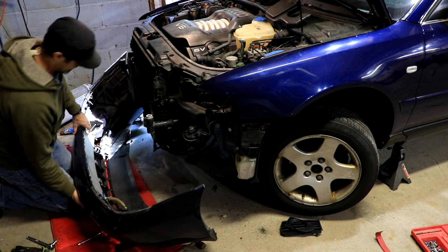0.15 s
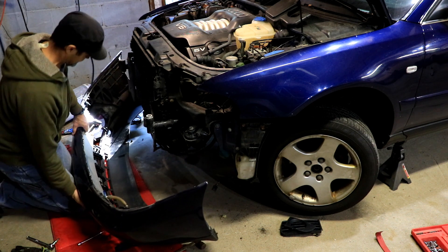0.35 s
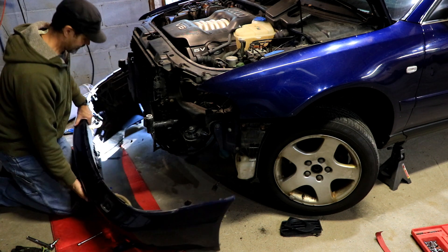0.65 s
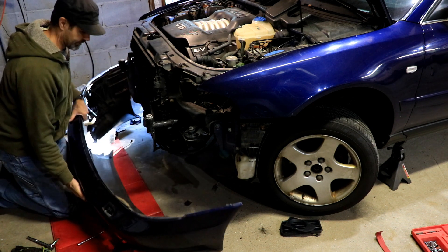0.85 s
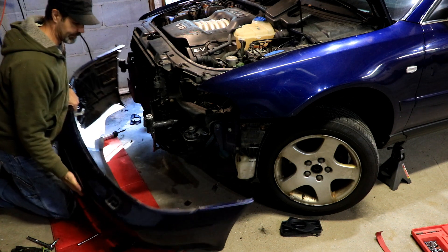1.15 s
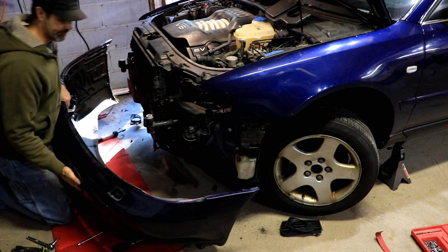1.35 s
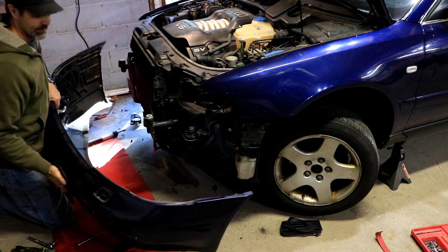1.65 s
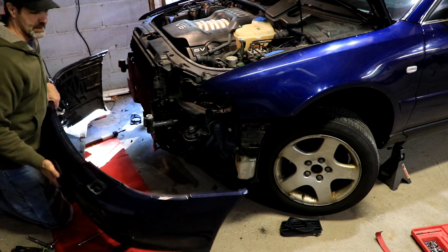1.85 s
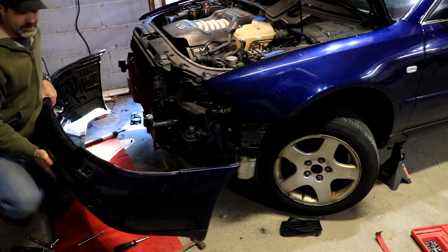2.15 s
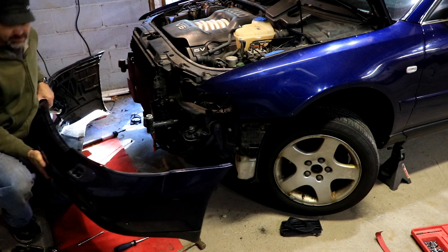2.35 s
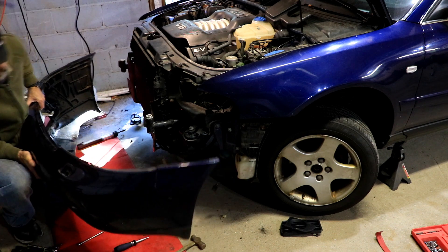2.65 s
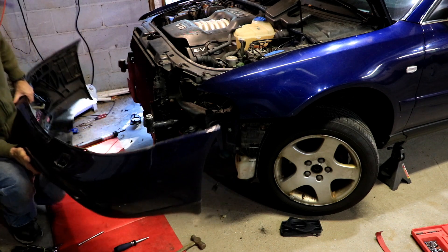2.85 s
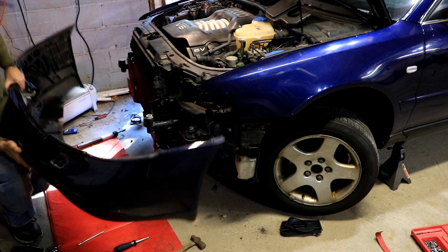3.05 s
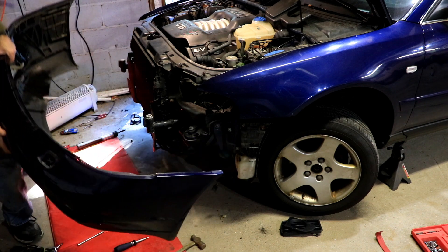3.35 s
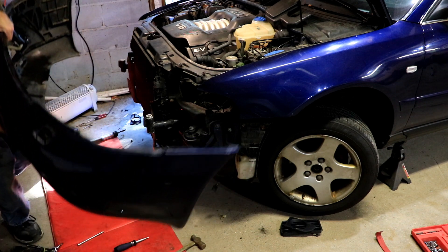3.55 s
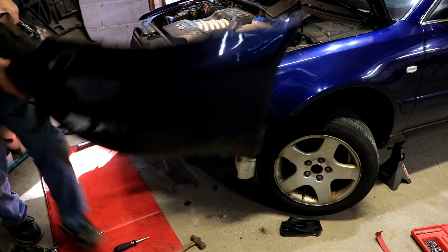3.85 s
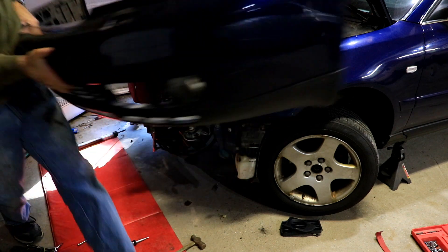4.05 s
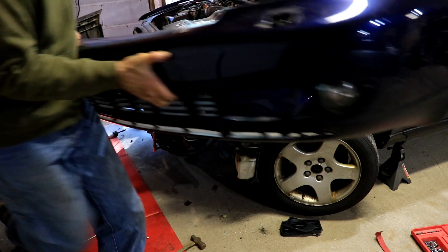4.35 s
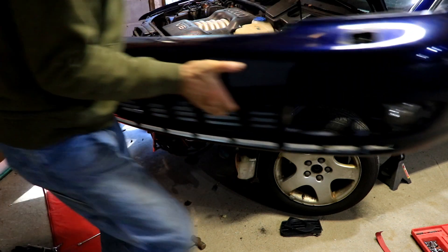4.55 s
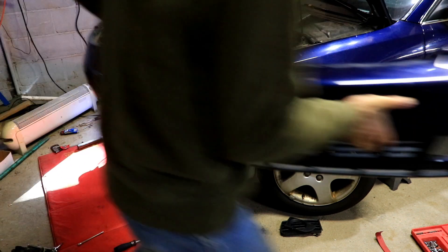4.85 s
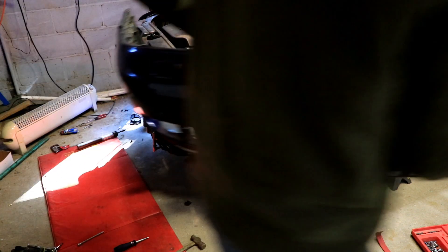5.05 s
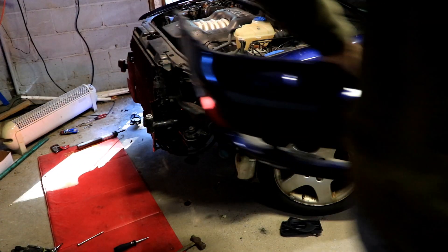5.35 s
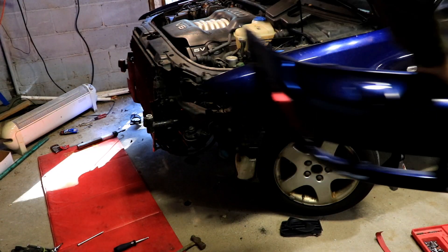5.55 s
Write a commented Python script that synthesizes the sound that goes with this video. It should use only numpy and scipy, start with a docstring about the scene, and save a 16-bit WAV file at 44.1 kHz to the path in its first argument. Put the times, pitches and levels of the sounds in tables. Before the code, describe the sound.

A quiet garage with a low room tone, faint hiss and short hard-walled reverberation; practically centred sound. From 0 s a plastic bumper cover slides with soft hisses. At 0.55-0.76 s hollow knocks land, with a very sharp snap at 0.7, then a thin, faint plastic squeal. Cloth rustles and light knocks follow at 1.0-1.4, a smooth slide at 1.7. At 2.0-2.2 knocks lead into a coarse, gritty scrape with a brief screech around 2.25-2.35, while a steel rod bounces with bright clinks until 2.5. A short rubbery judder comes at 2.77. At 3.2-3.5 a steel tool is shoved ringing across concrete, fading into dull dragging. From 4.2 cloth swishes, tiny very high jingles and plastic knocks come close, with dry creaking snaps crowding 4.36-5.03. A soft low flutter of air passes at 5.0; a last soft slide and small knock at 5.55-5.65.

```python
"""Plastic shell dragged through a garage

A man drags a plastic bumper cover off a car, lifts it and carries it past the microphone. Modal blows and
stick-slip friction make the shell knock, slide and judder on the floor and shove steel tools about.
Sharp cracks, decaying pressure swings, edge some knocks and become creaking dry snaps close by, while a small
metal piece rings in its modes.
Block walls answer as decaying noise; the sound is the same left and right, except for a faint hiss."""
import sys
import numpy as np
from scipy import signal
from scipy.fft import rfft, irfft
from scipy.io import wavfile

SR = 44100
rng = np.random.default_rng(int(sys.argv[2]) if len(sys.argv) > 2 else 0)


def dump_mix(stems):
    """Bounce the given channels to the path in sys.argv[1] as a 16-bit WAV at rate SR."""
    frames = np.atleast_2d(stems).T  # one column per channel
    limited = np.clip(frames, -1, 1)  # hard clip at full scale
    pcm = np.round(limited * 32767).astype(np.int16)
    wavfile.write(sys.argv[1], SR, pcm)


N = 251359
T = np.arange(N) / SR
RING = T[:SR // 2]  # time axis of one ringing sound, in seconds


def undb(db):
    """Logarithmic level: decibels to amplitude gain."""
    return 10 ** (np.asarray(db) / 20)


def unit(x):
    """Power normalization: scale to rms 1."""
    return x / np.sqrt(np.mean(x ** 2))


def unit_attack(x):
    """Onset normalization: scale a blow to rms 1 over its first 20 ms."""
    return x / np.sqrt(np.mean(x[:SR // 50] ** 2))


def add(track, s, sound):
    """Superposition: mix a sound in at time s."""
    i = max(int(s * SR), 0)
    track[i:i + len(sound)] += sound[:N - i]


def cut(x, hz, kind="low", order=2):
    """Band limiting by a Butterworth low- or high-pass."""
    return signal.sosfilt(signal.butter(order, min(hz, SR / 2 - 1), kind, fs=SR, output="sos"), x)


def colour(x, points):
    """Spectral shaping: weight a signal by a (Hz, dB) curve, then scale to rms 1."""
    hz, db = np.transpose(points)
    size = 2 ** 18
    f = np.fft.rfftfreq(size, 1 / SR) + 1  # the 1 Hz offset keeps the logarithm finite
    gain = undb(np.interp(np.log(f), np.log(hz), db))
    return unit(irfft(rfft(x, size) * gain)[:N])


def fade(t60):
    """Exponential damping: 60 dB lost in t60 seconds."""
    return np.exp(-np.log(1000) * RING / t60)


def ring(modes, scatter_db, detune=0):
    """Modal superposition: each blow weights the modes anew, and the changing support detunes them."""
    share, shift = rng.standard_normal((len(modes), 2)).T
    out = 0
    for k, (hz, db, t60) in enumerate(modes):
        swing = np.sin(2 * np.pi * hz * (1 + detune * shift[k]) * RING)
        out = out + (-1) ** k * undb(db + scatter_db * share[k]) * swing * fade(t60)
    return out


def resonate(x, modes, damping=1):
    """Forced resonance: drive (Hz, width Hz, dB) modes through a unit-energy impulse response."""
    response = 0
    for k, (hz, width, db) in enumerate(modes):
        decay = np.exp(-np.pi * damping * width * RING)
        response = response + (-1) ** k * undb(db) * width * np.sin(2 * np.pi * hz * RING) * decay
    return signal.fftconvolve(x, response / np.sqrt(np.sum(response ** 2)))[:N]


def walk(rate):
    """Slow random fluctuation: interpolated chance, rate values a second, with a spread near 1."""
    return 1.2 * np.interp(T * rate, np.arange(4000), rng.standard_normal(4000))


def waver(x, depth, rate):
    """Frequency modulation: a drifting clock makes all pitches wander together by a small share."""
    clock = np.arange(N)
    drift = signal.lfilter([depth], [1, -1 + 10 / SR], walk(rate))
    finer = signal.resample_poly(x, 4, 1)
    return np.interp(clock + drift, np.arange(4 * N) / 4, finer)


def friction(rate, spread_db, uneven_db):
    """Stick-slip friction: tiny slips of unequal size, rate a second, scaled by uneven pressure."""
    slips = (rng.random(N) < rate / SR) * rng.choice([-1, 1], N)
    sizes = undb(spread_db * np.minimum(rng.exponential(size=N), 5))
    return unit(slips * sizes * undb(uneven_db * walk(90)))


def stroke(start, db, attack, hold, release, power=1):
    """Energy envelope of a rub: at power 1, energy grows evenly, holds, then falls 20 dB per release time."""
    rise = np.sqrt(np.clip((T - start) / attack, 0, 1))
    fall = undb(-20 * np.maximum(T - start - attack - hold, 0) / release)
    return undb(db) * (rise * fall) ** power


def strokes(rows, power=1):
    """Incoherent addition: where strokes overlap their energies add."""
    return np.sqrt(sum(stroke(*row, power=power) ** 2 for row in rows))


def raised(rows, axis):
    """Level offset: the same strokes with one of their dB columns added to the level."""
    return [(row[0], row[1] + row[axis], *row[2:5]) for row in rows]


TREBLE_POWER = 1.66  # the treble's rise and fall follow the stroke's rise and fall to this power


def rubbed(x, rows, split_hz):
    """Speed-dependent friction: treble has its own level and fades faster as the motion slows."""
    body = cut(x, split_hz) * strokes(row[:5] for row in rows)
    treble = cut(x, split_hz, "high") * strokes(raised(rows, axis=5), TREBLE_POWER)
    return body - treble


def room(x, t60_low=0.55, t60_high=0.37, air_hz=9000, delay=0.001):
    """Diffuse reverberation of the garage: decaying noise whose treble dies first."""
    noise = rng.standard_normal(len(RING))
    low = cut(noise, 1230) * fade(t60_low)
    high = cut(cut(noise, 2090, "high"), air_hz, order=1) * fade(t60_high)
    tail = (low - high) * np.clip(RING / delay - 1, 0, 1)  # silent for one delay, then rising over another
    return signal.fftconvolve(x, tail / np.sqrt(np.sum((noise * fade(t60_low)) ** 2)))[:N]


# Spectrum of the quiet garage. Each row: frequency in Hz, relative level in dB.
GARAGE_COLOUR = [(12, -39), (20, -11), (86, 2), (198, -3.5), (328, 1), (527, -11.5), (660, -2), (802, -9),
                 (1190, -7), (1440, -9), (1910, -11), (6720, -20.5), (8410, -19), (14700, -25.5),
                 (16000, -26)]


def garage_noise(level_db=-50, sway_db=0.8):
    """Background noise: coloured noise of the garage whose level sways slowly."""
    return undb(level_db + sway_db * walk(4)) * colour(rng.standard_normal(N), GARAGE_COLOUR)


# Air stirred by the passing body, and its wake. Each row: start in seconds, relative level in dB,
# attack, hold and release in seconds.
DRAUGHTS = [(4.985, -43.5, 0.035, 0.032, 0.62), (5.35, -51, .05, .05, .1)]


def draught(level_db=-1):
    """Turbulence: low-frequency noise flutters as the man walks by."""
    flutter = colour(rng.standard_normal(N), [(15, -33), (25, -25), (33, 2.0), (50, 0), (75, -20.0),
                                              (130, -8.5), (500, -85)])
    return undb(level_db) * flutter * strokes(DRAUGHTS)


# Clothes and hands on the shell, one swish a move. Each row: start in seconds, relative level in dB,
# length before the release in seconds.
RUSTLES = [(0.865, -53, 0.23), (1.136, -42.5, 0.27), (2.766, -47.5, 0.12), (3.107, -50.5, 0.064),
           (4.028, -50.5, 0.23), (4.212, -39.5, .17), (4.487, -47, .2), (4.76, -41, 0.28)]
# Spectrum of the rustle. Each row: frequency in Hz, relative level in dB.
RUSTLE_COLOUR = [(59, -44), (100, -6), (204, -1), (521, 4), (665, -9), (999, -4), (2210, -6.5),
                 (2880, -7.5), (5090, -10.5), (7060, -17), (8310, -10), (10600, -30), (13000, -20)]


def rustling(level_db=-2, attack_share=0.27, release_s=0.18):
    """Fibre friction: many uneven slips of cloth and hands blend into swishes."""
    moves = [(s, db, attack_share * length, (1 - attack_share) * length, release_s)
             for s, db, length in RUSTLES]
    return undb(level_db) * colour(friction(9000, 2.2, 1.2), RUSTLE_COLOUR) * strokes(moves)


# Dull dragging as the shell is lifted. Each row: start in seconds, relative level in dB,
# attack, hold and release in seconds.
DRAGS = [(3.42, -37.5, 0.065, 0.22, 0.53), (3.78, -44.5, 0.03, 0.064, 0.19)]
# Spectrum of the dragging. Each row: frequency in Hz, relative level in dB.
DRAG_COLOUR = [(59, -47), (100, -12), (391, -3.5), (452, -7), (502, -1.5), (885, -6), (983, -8),
               (1210, -4.5), (1460, -20), (1590, -0.5), (1840, -12.5), (2270, -8), (2920, -15.5),
               (8340, -26), (15000, -52)]
# Resonances that drone under it. Each row: frequency in Hz, width in Hz, relative level in dB.
DRAG_MODES = [(517, 20, -4), (878, 12, 4), (1220, 70, -1), (1574, 40, 1), (1585, 38, -1.5), (2270, 21, -6)]


def dragging(scrape_db=-3, drone_db=-7):
    """Friction-driven resonance: slips scrape dully and make the shell drone."""
    drone = undb(drone_db) * unit(resonate(friction(4800, 1.0, 0.61), DRAG_MODES))
    scrape = undb(scrape_db) * colour(friction(5000, 0.8, 0.39), DRAG_COLOUR)
    return (scrape + drone) * strokes(DRAGS)


# Short rubbery judders. Each row: start in seconds, level in dB, attack, hold and release in seconds.
JUDDERS = [(2.757, -38, .008, .004, .02), (2.766, -28.5, 0.013, 0.023, 0.011)]
# Spectrum of the judder. Each row: frequency in Hz, relative level in dB.
JUDDER_COLOUR = [(59, -69), (100, -41), (179, -0.5), (275, -17), (387, -5.5), (681, -3.5), (768, -6),
                 (1000, -5), (1410, -18.5), (1870, -22), (3500, -57), (4550, -74), (7700, -120)]


def juddering(judder_hz=92):
    """Periodic stick-slip: the edge sticks and lets go in quick succession, each time a decaying burst."""
    stick_slip = rng.standard_normal(N) * np.exp(-2 * (T * judder_hz % 1))
    return colour(stick_slip, JUDDER_COLOUR) * strokes(JUDDERS)


# Thin squeals of rubbed plastic. Each row: start in seconds, relative level in dB,
# attack, hold and release in seconds.
SQUEALS = [(.81, -39.5, 0.048, .015, 0.36), (.97, -45.5, .04, 0.049, 0.25)]
# Resonances of the squeal. Each row: frequency in Hz, width in Hz, relative level in dB.
SQUEAL_MODES = [(2180, 170, -5), (2384, 41, 3.5), (2550, 310, -9)]


def squealing(level_db=-2):
    """Friction-driven resonance: rough slips feed a few close modes of the plastic."""
    return undb(level_db) * unit(resonate(friction(3000, 0.98, 1), SQUEAL_MODES)) * strokes(SQUEALS)


def handling(room_db=-7):
    """Superposition: dragging, rustling, judder and squeal share one reverberation."""
    out = dragging() + rustling() + juddering() + squealing()
    return out + undb(room_db) * room(out)


# Light slides over mat and floor, grouped by the part of the shell that touches. Each row: start in seconds,
# relative level in dB, attack, hold and release in seconds, treble offset in dB.
SLIDES = [
    [(.008, -37.5, 0.025, 0.058, .1, 0.5), (.075, -34, 0.035, 0.037, 0.32, -3),
     (.385, -48, 0.013, .02, 0.47, -7)],
    [(.56, -40, .11, 0.014, 0.4, 2), (1.615, -45, 0.018, 0.095, .1, -4),
     (1.697, -34.5, 0.035, 0.064, 0.14, -7), (2.01, -47.5, 0.058, 0.16, .15, -3.5),
     (2.8, -55.5, 0.077, .03, 0.28, -3)],
    [(5.534, -41.5, 0.0091, 0.14, 0.17, -12)],
]
# One spectrum for each group of slides. Each row: frequency in Hz, relative level in dB.
SLIDE_COLOURS = [
    [(59, -46), (100, -9), (197, -1), (302, 4), (442, -5), (621, 1.5), (676, -5.5), (950, -2), (1170, -5.5),
     (2000, -3.5), (4380, -8.5), (5190, -7), (8830, -14), (14400, -31.5), (16000, -28)],
    [(59, -43), (100, -3.5), (224, 4), (406, -4.5), (442, -3), (524, 1.5), (872, -11), (970, -5),
     (1680, -5.5), (2580, -1.5), (3780, -6.5), (4770, -4.5), (8640, -3.5), (13200, -14.5), (16000, -14)],
    [(59, -43), (100, -1), (215, -4), (244, 7), (721, -9), (784, -7), (930, -3), (2370, -8), (6150, -23),
     (16000, -34)],
]


def sliding(body_db=-1, treble_db=1, split_hz=4200, room_db=-6):
    """Dense friction: countless fine slips blend into a smooth hiss as the shell glides."""
    out = np.zeros(N)
    for rows, spectrum in zip(SLIDES, SLIDE_COLOURS):
        hiss = colour(friction(14000, 2, .7), spectrum)
        body, treble = unit(cut(hiss, split_hz)), unit(cut(hiss, split_hz, "high"))
        out += undb(body_db) * body * strokes(row[:5] for row in rows)
        out -= undb(treble_db) * treble * strokes(raised(rows, axis=5), TREBLE_POWER)
    return out + undb(room_db) * room(out)


# A steel tool is nudged, shoved and coasts along the floor. Each row: start in seconds, relative level in dB,
# attack, hold and release in seconds, treble offset in dB.
SHOVES = [(3.16, -56, 0.025, 0.044, 0.065, 8), (3.26, -36.5, 0.019, 0.0091, 0.1, 7.5),
          (3.33, -25.5, 0.032, 0.015, 0.13, -5), (3.455, -43, 0.028, 0.025, 0.38, -8)]
# The tool's resonances. Each row: frequency in Hz, width in Hz before added damping, relative level in dB.
STEEL = [(786, 48, -1), (1510, 150, -1), (2240, 40, -2), (2430, 26, -3), (3260, 41, -3), (4360, 120, -1),
         (4680, 35, -3), (4870, 41, -8), (5140, 36, -6), (5350, 29, -11), (5590, 32, 0), (5880, 25, -8),
         (6030, 39, -5), (6440, 99, -13), (6940, 78, -11), (7400, 29, -10), (7680, 59, -15),
         (8040, 36, -10), (8260, 26, -9), (8650, 37, -11), (9170, 120, -14), (10000, 58, -11),
         (10600, 32, -10), (10800, 22, -18), (11700, 52, -16), (12500, 31, -13), (12700, 34, -10),
         (13200, 30, -16), (13800, 47, -21), (14100, 28, -21)]


def shoved_tool(split_hz=8000, grit_db=-7, room_db=-6):
    """Sustained resonance: concrete grit keeps steel modes ringing; shifting contact makes them waver."""
    slips = friction(6000, 2.3, 1.2)
    drive = colour(slips, [(300, -11), (800, 2.5), (1500, 0.0), (2350, 2.5), (3100, 9), (3500, -8),
                           (4400, -1), (5600, 2), (7000, 2), (10000, 1.5), (13000, 2.5), (15500, -7.5)])
    grit = colour(slips, [(120, 1), (550, 11), (1500, -4), (2300, -27), (3600, -1), (4600, -3),
                          (5800, -8), (7500, -27), (11500, -13), (13000, 1), (15500, -12)])
    rings = waver(resonate(rubbed(drive, SHOVES, split_hz), STEEL, damping=1.1), .004, 120)
    out = rings + undb(grit_db) * rubbed(grit, SHOVES, split_hz)
    return out + undb(room_db) * room(out)


# The shell's edge grinds over grit. Each row: start in seconds, level in dB, attack, hold and release in
# seconds, brightness offset in dB, screech offset in dB.
GRINDS = [(2.236, -21.5, 0.017, 0.0092, .04, -5.5, -9.5), (2.256, -17.5, 0.011, 0.0065, .035, -2, -4.5),
          (2.276, -20.5, 0.016, 0.0042, 0.031, -24, 7.5), (2.297, -25.5, 0.012, 0.051, 0.065, -21, -5),
          (2.348, -27.5, .006, 0.0055, 0.034, 0, 0), (2.401, -32.5, .02, 0.01, 0.088, -1, -1)]
# Spectrum of the scrape. Each row: frequency in Hz, relative level in dB.
GRIND_COLOUR = [(59, -55), (100, -43), (166, -18), (381, 1.5), (502, -3.5), (570, 4), (648, -16), (705, -2),
                (1330, -3.5), (1830, -4.5), (2220, -9), (3470, -26), (4110, -11.5), (8460, -11),
                (16000, -29)]


def grinding(bright_hz=4200, room_db=-7):
    """Coarse stick-slip: brighter while the edge moves fast, exciting screech modes where it bites."""
    scrape = colour(friction(6000, 1.9, 0.93), GRIND_COLOUR)
    screech_modes = [(2130, 104, 3.5), (2660, 270, 2), (2930, 160, 4), (3460, 580, -2.5)]  # Hz, width Hz, dB
    screech = unit(resonate(friction(4000, 2.7, 0.73), screech_modes))
    out = rubbed(scrape, GRINDS, bright_hz) + screech * strokes(raised(GRINDS, axis=6))
    return out + undb(room_db) * room(out)


def clinks(hits, modes, tick_db, room_db, detune, tick_t60=0.021):
    """Impact excitation: a metal piece ticks and rings in its modes at each contact."""
    out = np.zeros(N)
    for s, db in hits:
        tick = unit_attack(cut(rng.standard_normal(len(RING)), 4700, "high") * fade(tick_t60))
        tone = unit_attack(ring(modes, 3.6, detune))
        add(out, s, undb(db) * (tone + undb(tick_db) * tick))
    return out + undb(room_db) * room(out)


# A loose fastener clinks in the shell. Each row: time in seconds, level in dB.
CLINKS = [(4.357, -37.5), (4.4212, -39), (4.5, -56)]
# Its modes. Each row: frequency in Hz, relative level in dB, t60 in seconds.
FASTENER = [(4480, 12, 0.03), (4830, 5, 0.034), (4940, -18, 0.042), (4900, -14, 0.059), (8000, -24, .04)]


def loose_fastener():
    """Modal ringing: the fastener's modes shift a little from contact to contact."""
    return clinks(CLINKS, FASTENER, tick_db=-25, room_db=-2.5, detune=0.0043)


# Jingles of a tiny metal piece, like a zip pull. Each row: time in seconds, level in dB.
JINGLES = [(4.2232, -35.5), (4.3574, -22.5), (4.364, -24.5), (4.421, -40), (4.5585, -40.5), (4.5974, -34.5),
           (4.7146, -30.5), (4.8338, -47), (4.8822, -49), (4.9186, -44), (4.9585, -37), (5.0269, -41)]
# Its modes. Each row: frequency in Hz, relative level in dB, t60 in seconds.
PULL = [(14520, -7, .025), (14690, -5, .05), (14775, 0, .19), (14850, -4, .06), (15020, -6, .03)]


def jingling_piece():
    """Modal ringing: a tiny body rings very high, at steady pitches."""
    return clinks(JINGLES, PULL, tick_db=-17.0, room_db=-2.0, detune=0)


# A steel rod bounces on the concrete. Each row: time in seconds, level in dB.
BOUNCES = [(2.353, -26), (2.361, -37), (2.391, -29), (2.411, -28.5), (2.499, -41.5)]
# Its modes. Each row: frequency in Hz, relative level in dB, t60 in seconds.
ROD = [(3630, 4, 0.13), (3670, 13, 0.037), (4300, -11, 0.091), (6950, 7, 0.057), (6910, 1, 0.073),
       (7400, -4, .12), (9500, -0.5, 0.037), (10340, -2, 0.1), (11100, -11, 0.11), (14300, -15, .04)]


def bouncing_rod():
    """Modal ringing: each bounce weights and detunes the rod's modes anew."""
    return clinks(BOUNCES, ROD, tick_db=-8, room_db=-5, detune=0.0052)


# Sharp cracks of plastic: dry snaps, and the bright edge of some knocks. Each row: time in seconds,
# peak level of the swing in dB, pitch in Hz.
CRACKS = [(0.0181, -18.5, 4520), (0.555, -10.5, 4900), (.7045, -3, 6050), (.7066, -8, 3250),
          (1.18, -24, 6500), (1.33, -20.5, 5000), (2.0703, -19.5, 6140), (2.173, -13, 7300),
          (4.3571, -11, 4100), (4.4214, -7, 2100), (4.5002, -13, 2180), (4.56, -21.5, 3020),
          (4.591, -4, 3380), (4.5965, -15.5, 3800), (4.7047, -15.5, 5300), (4.7136, -10, 4740),
          (4.7414, -6, 4090), (4.76, -22, 4600), (4.8306, -9.5, 2570), (4.889, -11, 2540),
          (4.929, -12, 2440), (4.9584, -10, 6300), (5.0151, -13.5, 2780), (5.0262, -14.5, 6400),
          (5.6418, -19, 3460)]


def cracks(cycles=1.2, rounding=2.6, shiver_db=-19, shiver_t60=0.032, room_db=-5):
    """Heavily damped oscillation: one fast swing of pressure, then a faint shiver of the shell."""
    out = np.zeros(N)
    for s, db, hz in CRACKS:
        swing = cut(np.sin(2 * np.pi * hz * RING) * fade(2 * cycles / hz), rounding * hz, order=3)
        shiver = unit(cut(rng.standard_normal(len(RING)), hz)) * fade(shiver_t60)
        add(out, s, undb(db) * (swing / swing.max() + undb(shiver_db) * shiver))
    return out + undb(room_db) * room(out)


# Contacts of the blows on the shell; some blows have several close contacts. Each row: time in seconds,
# level in dB, contact sharpness in Hz, t60 of the dense modes in seconds, flexing mode in Hz,
# flexing level in dB before the radiation high-pass.
KNOCKS = [(.552, -24.5, 2320, 0.059, 296, -24), (.578, -32, 500, 0.074, 268, -30),
          (.683, -24.5, 2300, .14, 687, -27), (.703, -19, 3400, 0.13, 704, -22.5),
          (0.706, -30, 800, 0.11, 321, -21.5), (.764, -30, 1000, 0.44, 329, -42),
          (.957, -34.5, 586, 0.45, 330, -45), (1.017, -40, 2695, 0.019, 1118, -45.5),
          (1.18, -37, 3700, .06, 1365, -43.5), (1.288, -41, 496, 0.2, 204.5, -33),
          (1.347, -30, 1160, 0.1, 665, -33), (1.357, -41, 705, 0.11, 216, -34),
          (1.382, -60, 600, 0.16, 228, -36), (2.004, -39, 5330, 0.042, 2440, -55),
          (2.171, -32, 3450, 0.16, 270, -40.5), (2.233, -27.5, 1700, .097, 594, -52),
          (2.27, -33, 1500, 0.087, 742, -28), (2.292, -29.5, 1800, 0.045, 1370, -30),
          (2.424, -30, 1900, 0.07, 1340, -47), (3.192, -47, 875, 0.071, 355, -52),
          (4.194, -36.5, 860, 0.031, 294, -43), (4.223, -25.5, 2330, 0.067, 620, -27.5),
          (4.227, -32, 800, 0.042, 306, -25.5), (4.24, -43, 600, 0.12, 206, -29),
          (4.358, -41.5, 1210, 0.038, 266, -36.5), (4.872, -33.5, 790, 0.032, 358, -26.5),
          (4.942, -26, 1700, .07, 1790, -30), (4.947, -29, 700, .06, 324, -33),
          (4.972, -43, 500, 0.29, 315.4, -26), (5.07, -36.5, 610, .058, 306, -37),
          (5.319, -50, 400, 0.14, 447, -50.5), (5.632, -35.5, 3050, 0.065, 1255, -64)]
# The weight follows each contact: weaker, duller, with its own t60, and bending a longer stretch of plastic.
SEAT_S, SEAT_DB, SEAT_T60_S, SEAT_FLEX_DB = 0.00496, -8.5, 0.077, -3.5
SEAT_SHARPNESS_SHARE, SEAT_FLEX_SHARE = 0.45, 0.45


def contacts():
    """Two-stage impact: each contact is followed by the shell's weight settling on it."""
    for s, db, sharp_hz, t60, flex_hz, flex_db in KNOCKS:
        yield s, db, sharp_hz, t60, flex_hz, flex_db
        yield (s + SEAT_S, db + SEAT_DB, sharp_hz * SEAT_SHARPNESS_SHARE, SEAT_T60_S,
               flex_hz * SEAT_FLEX_SHARE, flex_db + SEAT_FLEX_DB)


# The shell's own modes. Each row: frequency in Hz, relative level in dB, t60 in seconds.
SHELL = [(136, -10.5, 0.076), (252, -0.5, 0.071), (317.3, 6, 0.081), (441, -4, 0.05), (570, 0, 0.078),
         (696, 2.5, 0.072), (802, -1.5, 0.046), (1115, -3.5, 0.023), (1310, -10.5, 0.39), (1655, 5, 0.053),
         (2157, 16, 0.019), (2786, 7, 0.022), (3030, 2, 0.13)]
# The garage answers less once the shell is carried up close. Each row: time in seconds, room level in dB.
KNOCK_ROOM = [(3.5, -5), (4.3, -8)]


def knocks(modes_db=-7, crack_t60=0.049, flex_ring=0.7, radiates_hz=125, split_hz=1500, crack_db=-2,
           lowest_hz=190, edge_db=-21, push=0.00049):
    """Impact excitation: each blow rings the shell and flexes the struck part; softer contact is duller."""
    direct, sent = np.zeros(N), np.zeros(N)
    for s, db, sharp_hz, t60, flex_hz, flex_db in contacts():
        noise = rng.standard_normal(len(RING))
        # countless damped modes blur into a short burst around the few clear ones
        crack = undb(crack_db) * cut(noise, split_hz, "high") * fade(crack_t60)
        dense = cut(noise, split_hz) * fade(t60) - crack
        clear = ring(SHELL, 2.5, .006)
        body = unit_attack(cut(dense, lowest_hz, "high")) + undb(modes_db) * unit_attack(clear)
        # a hard edge lets a little treble past the soft contact
        contact = cut(body, sharp_hz) + undb(edge_db) * cut(body, 2 * sharp_hz, order=1)
        strike = unit_attack(contact * (1 - np.exp(-RING / push)))
        onset = 1 - np.exp(-2 * flex_hz * RING)
        flex = unit_attack(np.sin(2 * np.pi * flex_hz * RING) * fade(flex_ring * t60) * onset)
        # the lowest bending radiates poorly
        blow = undb(db) * strike + undb(flex_db) * cut(flex, radiates_hz, "high", order=4)
        add(direct, s, blow)
        add(sent, s, blow * undb(np.interp(s, *np.transpose(KNOCK_ROOM))))
    return direct + room(sent)


def scene():
    """Linear superposition: all sources add, alike in both channels."""
    background = garage_noise() + draught()
    rubbing = handling() + sliding() + shoved_tool() + grinding()
    metal = loose_fastener() + jingling_piece() + bouncing_rod()
    mono = background + rubbing + metal + cracks() + knocks()
    return np.array([mono, mono])


def record(dry, hiss_db=-70, top_hz=15900):
    """Saturation and band limiting: separate faint hisses join, peaks are rounded and the top is cut."""
    hiss_colour = [(25, 12), (170, 8), (600, -2), (3000, -13), (9000, 1.5), (15000, -14)]  # Hz, dB
    hiss = np.array([colour(rng.standard_normal(N), hiss_colour) for _ in dry])
    out = np.tanh(dry + undb(hiss_db) * hiss)
    return signal.sosfilt(signal.ellip(10, .2, 80, top_hz, fs=SR, output="sos"), out)


dry = scene()
out = record(dry)
dump_mix(out)
```